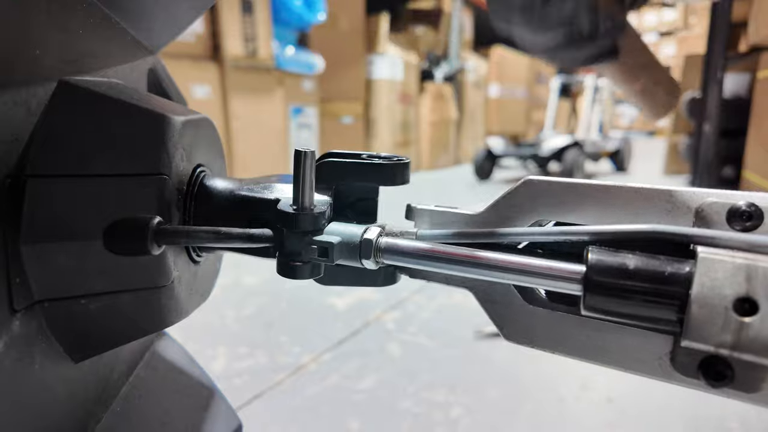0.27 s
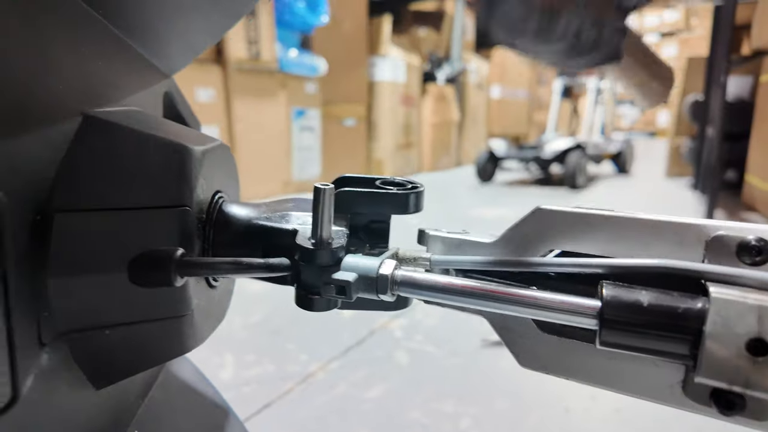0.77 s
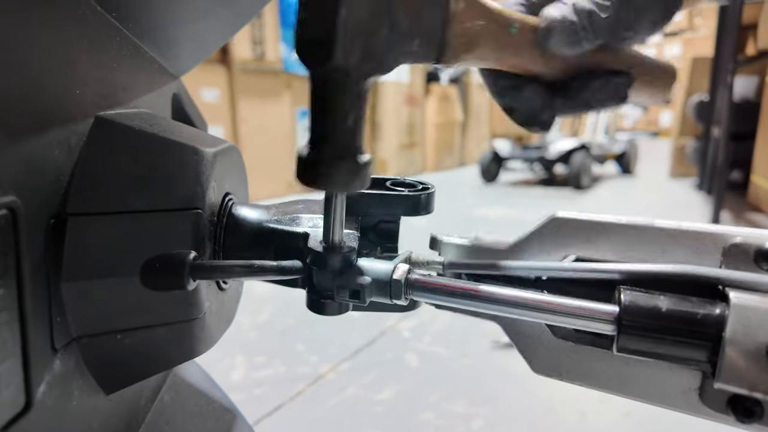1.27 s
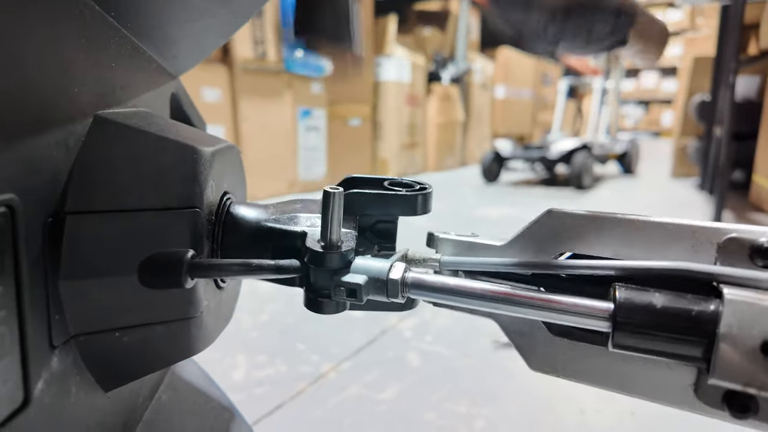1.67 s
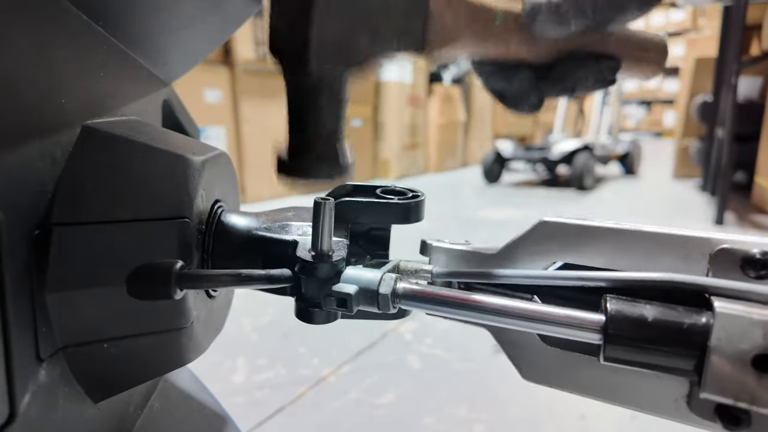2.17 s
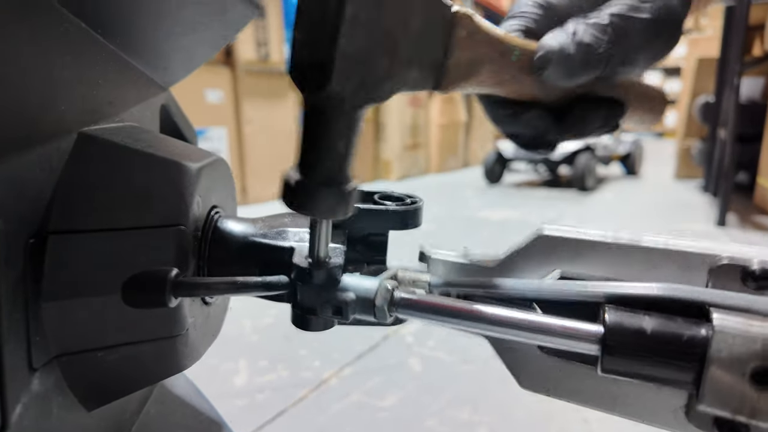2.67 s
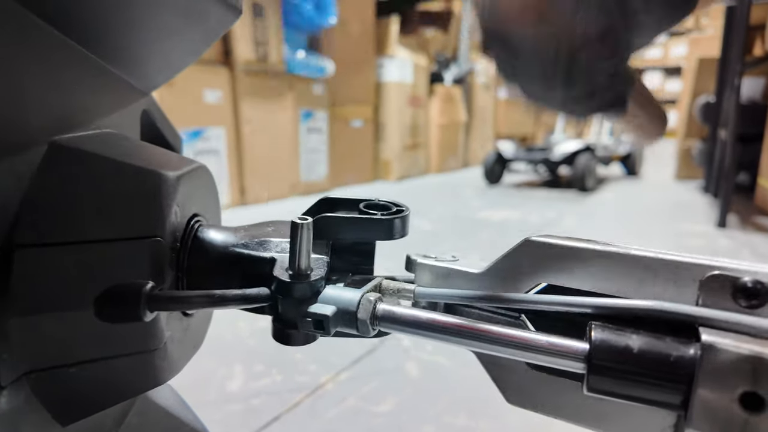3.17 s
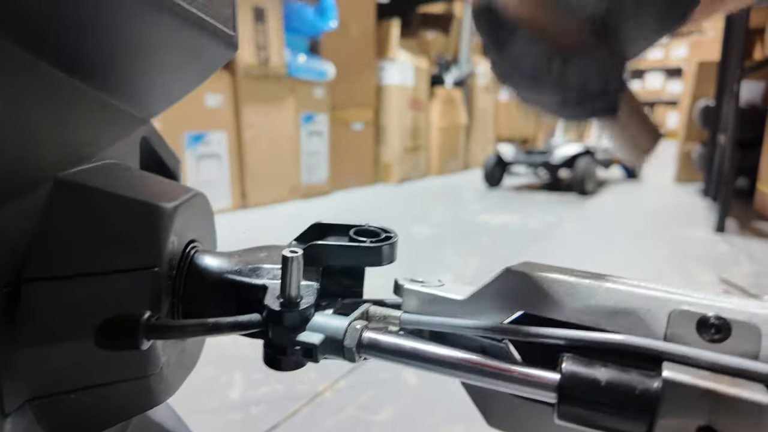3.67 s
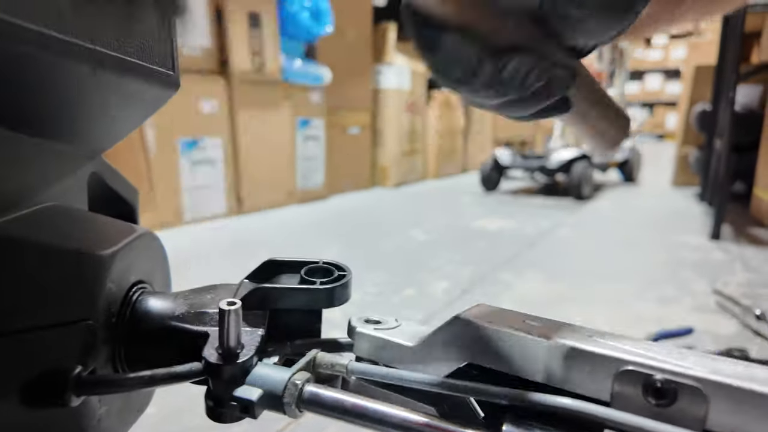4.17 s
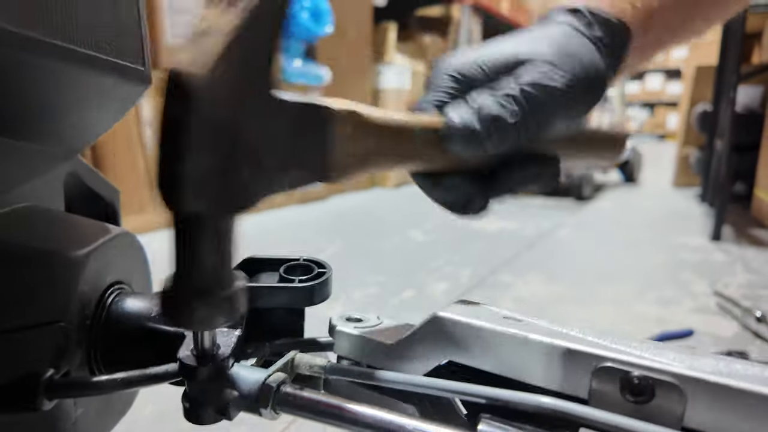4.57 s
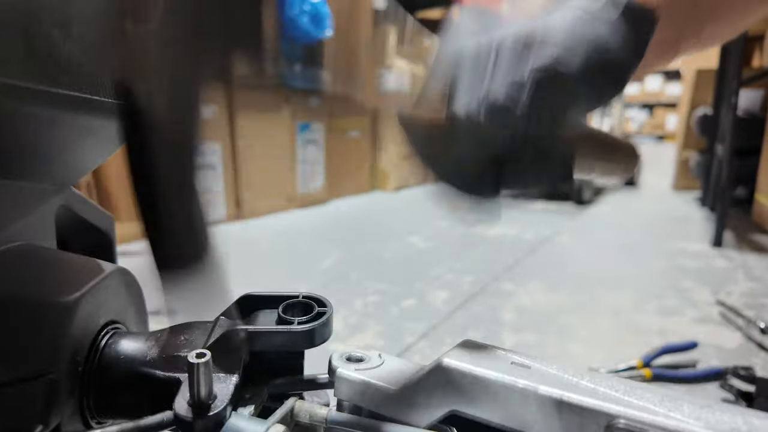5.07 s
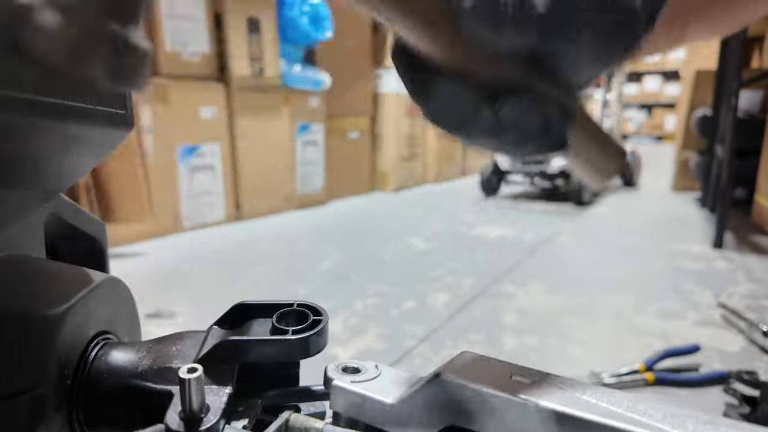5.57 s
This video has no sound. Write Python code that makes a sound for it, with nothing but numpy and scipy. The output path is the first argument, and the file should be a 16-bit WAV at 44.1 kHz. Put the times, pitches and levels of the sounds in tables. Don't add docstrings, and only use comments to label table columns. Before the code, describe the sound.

A steel hammer pounds a metal pin in a steady rapid run, each sharp clank trailed by a rattle and faint high ring.

```python
import sys
import numpy as np
from scipy import signal
from scipy.io import wavfile
from scipy.ndimage import uniform_filter1d, map_coordinates

SR = 44100
rng = np.random.default_rng(int(sys.argv[2]) if len(sys.argv) > 2 else 0)


def gain_from_decibels(decibels):
    exponent = np.asarray(decibels, float) / 20
    return 10 ** exponent


def transcribe(u):
    v = np.clip(np.atleast_2d(u).T, -1, 1)
    q = np.round(v * 32767).astype(np.int16)
    wavfile.write(sys.argv[1], SR, q)


N = 257103
SPAN = SR // 3

# pitch_hz, level_db (per Hz)
HUM_COLOUR = [(20, 10), (40, 9), (80, 4), (130, 0), (250, -8), (500, -1), (1200, -8.5), (3000, -21),
              (6500, -25), (12000, -35.5), (16000, -51)]
# pitch_hz, width_hz, boost_db
DUCTS = [(150, 14, 5), (197, 16, 8), (358, 16, 10), (824, 50, 4)]
# pitch_hz, level_db
FAN_NOTES = [(197, -66), (358, -68)]
# start_s, level_db, pitch_hz, fade_s (time to fall 60 dB)
KNOCKS = [
    (.053, -58, 3100, .03),
    (.124, -50, 750, .05),
    (.131, -52, 1100, .03),
    (.126, -59, 2950, .035),
    (4.45, -40, 360, .09),
    (4.545, -49, 830, .12),
]
# start_s, level_db (peak), thud_db, hardness_db, fizz_db
BLOWS = [(0.394, -3, -23, -7, -16.5), (0.675, 2, -32, -4.5, -11), (0.969, 2, -24, -2, -16),
         (1.29, 1.5, -38, -3, -18.5), (1.578, 0.5, -24.5, 1.5, -13.5), (1.856, 0.5, -20.5, 1, -12),
         (2.14, 0.5, -24.5, 1, -8.5), (2.418, 0, -25.5, 1, -11), (2.695, 2, -23.5, -2, -10.5),
         (2.972, 2, -24.5, -2, -11), (3.24, 1.5, -19, 4, -7), (3.501, 1.5, -28, -1, -9),
         (3.769, 0, -28, -4.5, -12), (4.032, -0.5, -26, 2, -7), (4.308, 0, -25.5, 1, -8.5),
         (4.58, 0.5, -31.5, 3, -10), (4.858, -0.5, -27, 2, -9.5), (5.134, 0.5, -26.5, 6, -12),
         (5.403, 0.5, -24.5, 7.5, -10.5), (5.675, 1.5, -32, 4, -11.5)]
# start_s, level_db (peak), crack_db, punch_hz
LANDINGS = [(0.423, -24.5, -2.5, 960), (0.717, -12.5, -17, 720), (1.01, -14, -3.5, 842),
            (1.319, -34.5, -5, 950), (1.609, -8, -4.5, 1260), (1.889, -16.5, 2.5, 1020),
            (1.899, -12, -14.5, 754), (2.179, -15.5, -11, 840), (2.45, -2.5, -8.5, 1240),
            (2.728, -4.5, -6, 1220), (3.007, -4.5, -7, 1100), (3.275, -4, -9.5, 830),
            (3.535, -4.5, -5, 834), (3.799, -6, 1.5, 880), (4.066, -3, -7, 1247), (4.34, -2, -7.5, 870),
            (4.609, 0, -6, 894), (4.888, -2.5, -7, 1145), (5.167, -2.5, -8.5, 1080),
            (5.429, 0.5, -10, 1060), (5.701, 0.5, -10, 1270)]
# pitch_hz, level_db, fade_s (time to fall 60 dB)
FRAME = [(544.7, 0, 0.084), (709.2, 8.5, 0.069), (877, 6.5, 0.061), (983.3, 3.5, 0.087), (1113, 1, 0.091),
         (1250, -3, 0.14), (1515, -3.5, 0.06), (1808, 12, 0.035), (2565, 3, 0.06), (2737, 5, 0.064),
         (12200, -10.5, .09), (3860, -9, 0.13), (5250, -3.5, 0.1), (6900, -8.5, 0.055), (8750, -13, 0.07),
         (10620, -12.5, 0.26)]
# pitch_hz, level_db, fade_s (time to fall 60 dB)
ROCKING = [(160.6, -20.5, 0.22), (194.2, 1, 0.1), (232.5, -4.5, 0.11), (340.3, -7, 0.1)]
# pitch_hz, level_db (per Hz)
RATTLE = [(40, -36.5), (170, -17.5), (360, -15.5), (550, -5.5), (930, -8), (1400, -5), (2250, -8),
          (2830, -6.5), (4230, -11), (6000, -6), (9000, -6), (12500, -16.5), (15500, -18)]
# pitch_hz, fade_s (time to fall 60 dB)
RATTLE_FADE = [(100, 0.2), (700, 0.064), (3000, 0.042), (12000, 0.042)]
# pitch_hz, width_hz, boost_db
CLANK = [(893, 210, 4.5), (590, 100, -5), (2100, 200, -3), (2784, 81, 2.5), (4920, 170, 1)]
# pitch_hz, fade_s (time to fall 60 dB)
AISLE_FADE = [(100, 0.61), (500, 0.15), (2000, 0.2), (6000, 0.25), (14000, 0.25)]
# pitch_hz, boost_db
AISLE_TONE = [(100, 3.5), (200, 2.5), (500, 8.5), (2000, 6), (6000, 2.5), (14000, 0)]
# pitch_hz, width_hz, boost_db
LINGER = [(160, 47, 7.5), (865, 400, 8), (2550, 190, 2), (3670, 70, 9), (5040, 96, 5), (8840, 280, 7.5),
          (10620, 140, 10.5), (11500, 240, 9)]
HEAD_NOTES = (6003, 6414)
# level_db, fullest_s (after the blow), lobe_s
LOW_NOTE = [(-38.0, 0.184, 0.12), (-33.5, 0.04, 0.3), (-29.0, 0.106, 0.3), (-39.5, 0.154, 0.22),
            (-35.0, 0.142, 0.12), (-44.0, 0.1, 0.3), (-48.5, 0.082, 0.06), (-30.5, 0.148, 0.17),
            (-42.5, 0.118, 0.22), (-47.0, 0.088, 0.17), (-35.0, 0.1, 0.14), (-29.0, 0.178, 0.22),
            (-30.5, 0.166, 0.17), (-33.5, 0.118, 0.12), (-32.0, 0.184, 0.22), (-36.5, 0.142, 0.14),
            (-33.5, 0.142, 0.1), (-29.0, 0.16, 0.22), (-32.0, 0.178, 0.17), (-36.5, 0.118, 0.08)]
# level_db, fullest_s (after the blow), lobe_s
HIGH_NOTE = [(-32.0, 0.04, 0.17), (-36.5, 0.058, 0.14), (-26.0, 0.184, 0.22), (-30.5, 0.094, 0.09),
             (-30.5, 0.106, 0.08), (-32.0, 0.106, 0.08), (-42.5, 0.196, 0.07), (-35.0, 0.16, 0.07),
             (-41.0, 0.1, 0.06), (-39.5, 0.166, 0.06), (-41.0, 0.178, 0.09), (-33.5, 0.178, 0.22),
             (-26.0, 0.196, 0.08), (-30.5, 0.184, 0.08), (-33.5, 0.1, 0.08), (-50.0, 0.112, 0.12),
             (-38.0, 0.052, 0.09), (-32.0, 0.118, 0.09), (-39.5, 0.13, 0.14), (-38.0, 0.112, 0.08)]
BETWEEN_LOBES = (0.17, 0.13)


def unit(x):
    return x / np.sqrt(np.mean(x ** 2) + 1e-20)


def along(points, hz):
    f, v = np.transpose(points)
    return np.interp(np.log(hz + 1), np.log(f + 1), v)


def bumps(peaks, hz):
    return sum(db / (1 + (2 * (hz - c) / w) ** 2) for c, w, db in peaks)


def add(track, s, sound):
    track[round(s * SR):][:len(sound)] += sound


def hum():
    hz, _, z = signal.stft(rng.standard_normal(N + 2048), SR, nperseg=2048)
    across_pitch = uniform_filter1d(rng.standard_normal(z.shape), 16, 0)
    patches = unit(uniform_filter1d(across_pitch, 3, 1))
    colour = along(HUM_COLOUR, hz) + bumps(DUCTS, hz)
    noise = signal.istft(z * gain_from_decibels(colour[:, None] + .9 * patches), SR, nperseg=2048)[1][:N]
    t = np.arange(N) / SR
    notes = sum(gain_from_decibels(db) * np.sin(2 * np.pi * pitch * t) for pitch, db in FAN_NOTES)
    hum_db = -57
    return gain_from_decibels(hum_db) * unit(noise) + notes


def handling():
    track, t = np.zeros(N + SPAN), np.arange(SPAN) / SR
    slide_s, gap_s, slips = 4.465, .0115, 6
    slide_db, slide_hz, sag_hz, slip_fade_s = -39, 800, 22, .036
    slide = [(slide_s + k * gap_s, slide_db, slide_hz - k * sag_hz, slip_fade_s) for k in range(slips)]
    for s, db, hz, fade_s in KNOCKS + slide:
        rough = 1 + 0.71 * unit(uniform_filter1d(rng.standard_normal(SPAN), 40))
        strength = gain_from_decibels(db - 60 * t / fade_s) * (1 - np.exp(-t / .002))
        knock = strength * rough * np.sin(2 * np.pi * hz * t)
        add(track, s, gain_from_decibels(2.5) * knock)
    return track[:N]


def lead_ins():
    lead_s, lead_db = 0.0028, -52.5
    track, swell = np.zeros(N), np.linspace(0, 1, round(lead_s * SR))
    for s, db, *_ in BLOWS:
        lead_in = gain_from_decibels(db + lead_db + 42 * swell) * rng.standard_normal(len(swell))
        add(track, s + 0.00031 - lead_s, lead_in)
    return track


def ringing(modes, tilt, spread_db, rough):
    t = np.arange(SPAN // 2) / SR
    hz, level, fade_s = np.transpose(modes)[:, :, None]
    hz = hz * (1 + 0.0021 * rng.standard_normal(hz.shape))
    level = level + along(tilt, hz) + spread_db * rng.standard_normal(hz.shape)
    knots = rng.standard_normal((len(modes), 64))
    blur = np.array([np.interp(t, np.arange(64) * 0.011, row) for row in knots])
    wander = rough * (hz / 1000) ** 0.18 * (blur - blur[:, :1])
    notes = gain_from_decibels(level - 60 * t / fade_s) * np.sin(2 * np.pi * hz * t + wander)
    fade = np.cos(np.pi / 2 * (t / t[-1]) ** 2)
    return np.pad(notes.sum(axis=0) * fade, (0, SPAN - len(t)))


def dying_noise(fades, colour, size=256, far_db=-120):
    lead = 256
    hz, t, z = signal.stft(rng.standard_normal(SPAN + lead), SR, nperseg=size)
    fall_db = -60 * np.maximum(t - lead / SR, 0) / along(fades, hz)[:, None]
    gain = gain_from_decibels(colour(hz)[:, None]) * (gain_from_decibels(fall_db) + gain_from_decibels(far_db + fall_db / 3))
    x = signal.istft(z * gain, SR, nperseg=size)[1][lead:lead + SPAN]
    return x / np.sqrt(np.mean(gain[:, 0] ** 2))


def in_aisle(colour, wet_db):
    t = np.arange(SPAN) / SR
    echo_colour = lambda f: colour(f) + along(AISLE_TONE, f) + bumps(LINGER, f)
    tail = dying_noise(AISLE_FADE, echo_colour, size=512, far_db=-30)
    fade = np.cos(np.pi / 2 * (t / t[-1]) ** 4)
    return gain_from_decibels(wet_db) * tail * (1 - np.exp(-t / 0.0013)) * fade


def strike(tilt, ring_db, crack_db, punch_db, punch_hz, rattle_speed, wet_db, attack_s):
    t = np.arange(SPAN) / SR
    colour = lambda f: along(RATTLE, f) + along(tilt, f) + bumps(CLANK, f)
    rattle = dying_noise([(f, fade_s / rattle_speed) for f, fade_s in RATTLE_FADE], colour)
    crack = gain_from_decibels(crack_db - 60 * t / 0.02) * dying_noise([(1000, 9)], colour)
    swing = (t / 0.0015) * np.exp(1 - t / 0.001)
    punch = gain_from_decibels(punch_db) * swing * np.sin(2 * np.pi * punch_hz * t)
    ring = gain_from_decibels(ring_db) * ringing(FRAME, tilt, spread_db=1.5, rough=.55)
    onset = 1 - np.exp(-t / attack_s)
    return (ring + rattle + crack) * onset + punch + in_aisle(colour, wet_db)


def hammering():
    track, t = np.zeros(N + SPAN), np.arange(SPAN) / SR
    swing_up = 1 - np.exp(-(t / 0.005) ** 2)
    for s, db, thud_db, hard_db, fizz_db in BLOWS:
        # (Hz, dB)
        tilt = [(200, -2), (1000, -0.5), (4000, 0.76 * hard_db - 0.9),
                (9500, fizz_db + 3), (14000, 0.82 * hard_db + 0.5)]
        blow = strike(tilt, ring_db=-16.0, crack_db=6.5, punch_db=6.0, punch_hz=919,
                      rattle_speed=0.91, wet_db=-13.0, attack_s=0.0008)
        thud = swing_up * ringing(ROCKING, [(200, thud_db + 12.0)], spread_db=3.0, rough=0.3)
        add(track, s + 0.00026, gain_from_decibels(db - 2.5) * (blow + thud))
    for s, db, crack_db, hz in LANDINGS:
        tilt = [(200, -5.0), (1000, -2), (4000, crack_db), (12000, crack_db - 11.5)]
        punch_db = 5.5 - 0.5 * db
        landing = strike(tilt, ring_db=-21.5, crack_db=7.5, punch_db=punch_db, punch_hz=hz,
                         rattle_speed=0.93, wet_db=-16.0, attack_s=0.0014)
        thud = swing_up * ringing(ROCKING, [(200, -17.5)], spread_db=2.5, rough=0.99)
        add(track, s + 0.0004, gain_from_decibels(db - 11.0) * (landing + thud))
    small_source = signal.butter(N=4, Wn=125, btype="high", fs=SR, output="sos")
    return signal.sosfilt(small_source, track[:N])


def hammer_head():
    t = np.arange(N) / SR
    starts = np.array([row[0] for row in BLOWS])
    blow = np.searchsorted(starts, t) - 1
    since = np.abs(t - starts[blow])
    facing_s, facing_width_s, facing_boosts_db = .1, .04, (8, 4)
    facing = np.exp(-((since - facing_s) / facing_width_s) ** 2)
    slowing = .4
    turned = lambda s: facing_s * (s / facing_s) ** slowing / slowing
    wobble = lambda rate: map_coordinates(rng.standard_normal(round(N * 40 / SR) + 4), [t * rate])
    fall_db_per_s = 120
    out = np.zeros(N)
    notes = zip(HEAD_NOTES, (LOW_NOTE, HIGH_NOTE), facing_boosts_db, BETWEEN_LOBES)
    for hz, rows, facing_db, fill in notes:
        drift, flutter = wobble(15), wobble(35)
        tone = gain_from_decibels(1.8 * flutter) * np.sin(2 * np.pi * np.cumsum(hz + 2.5 * drift) / SR)
        level_db, fullest, lobe = np.array(rows)[blow].T
        lobes = np.hypot(np.cos(np.pi * (turned(since) - turned(fullest)) / lobe), fill)
        strength = gain_from_decibels(level_db + 3.5 + facing_db * facing - fall_db_per_s * since)
        out += strength * lobes * tone
    return out * (blow >= 0)


def scene():
    return (hum() + handling() + lead_ins() + hammering() + hammer_head())[None]


def band_limit(x):
    return signal.sosfilt(signal.butter(12, 16770, fs=SR, output="sos"), x)


def record(dry):
    microphone = signal.ellip(8, .5, 50, 15800, fs=SR, output="sos")
    x = signal.sosfilt(microphone, dry)
    clipped = x / (1 + np.abs(x / .98) ** 10) ** (1 / 10)
    no_top = signal.ellip(8, .5, 60, 16700, fs=SR, output="sos")
    no_rumble = signal.butter(1, 50, "high", fs=SR, output="sos")
    mix = signal.sosfilt(np.vstack([no_top, no_rumble]), clipped)
    return band_limit(mix)


dry = scene()
out = record(dry)
transcribe(out)
```